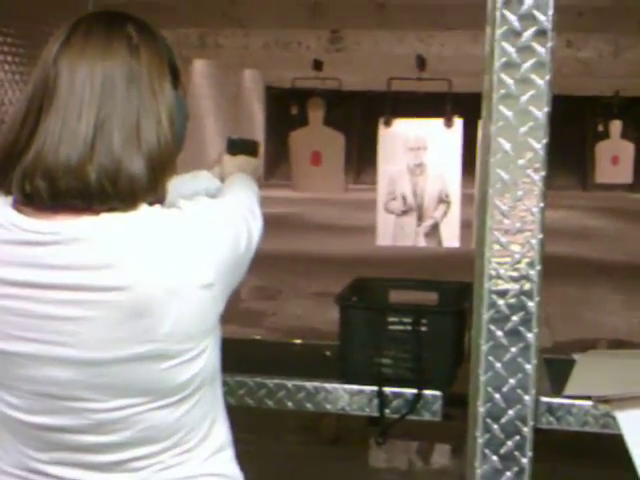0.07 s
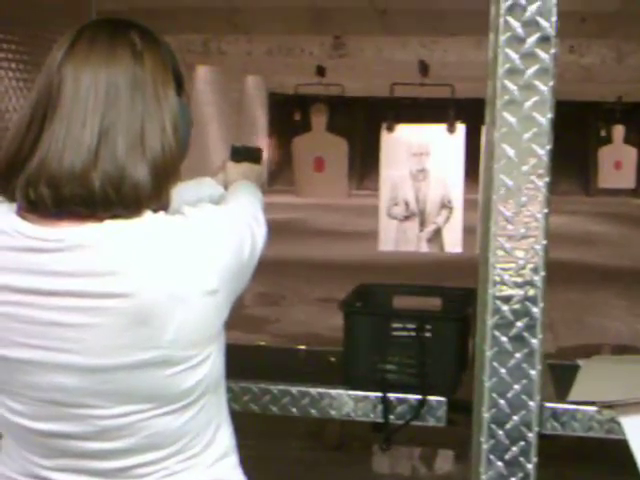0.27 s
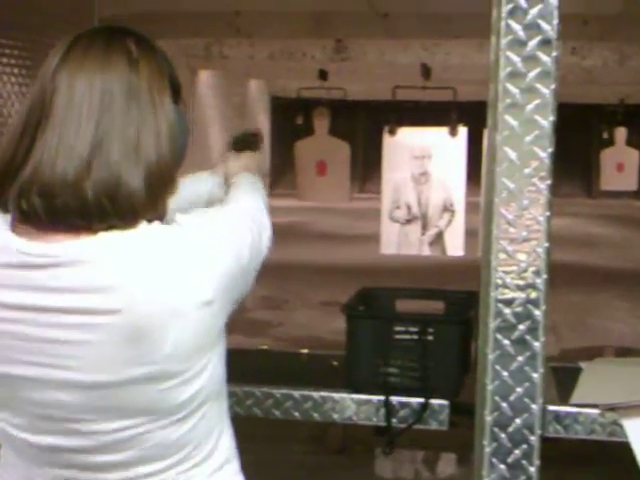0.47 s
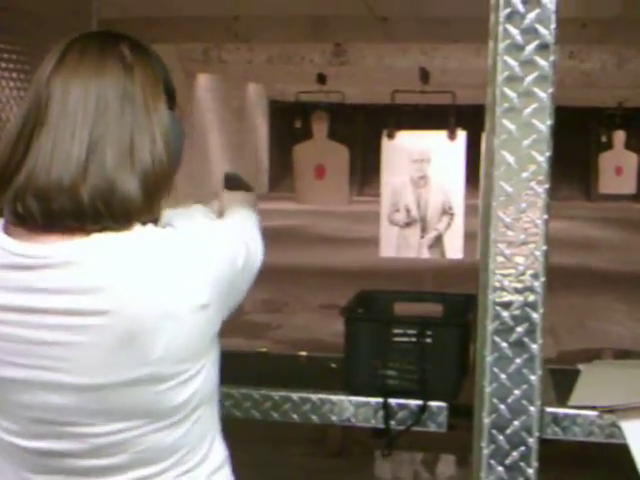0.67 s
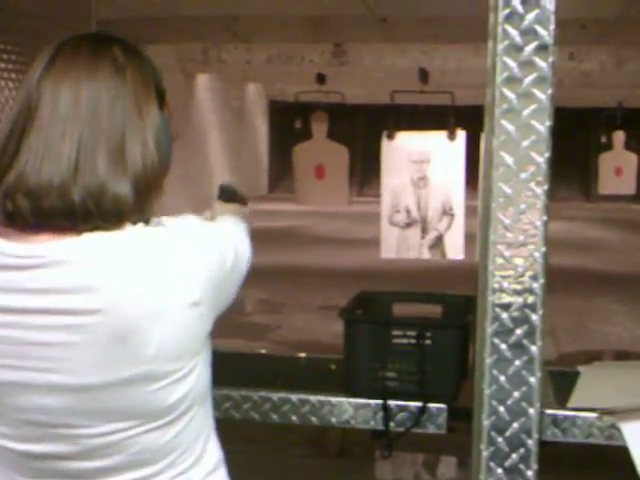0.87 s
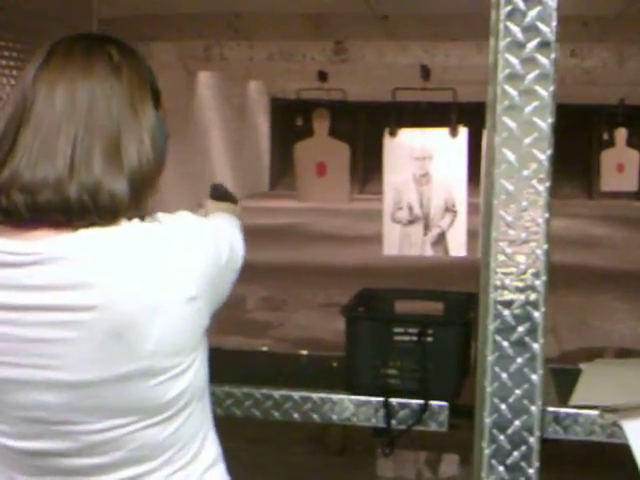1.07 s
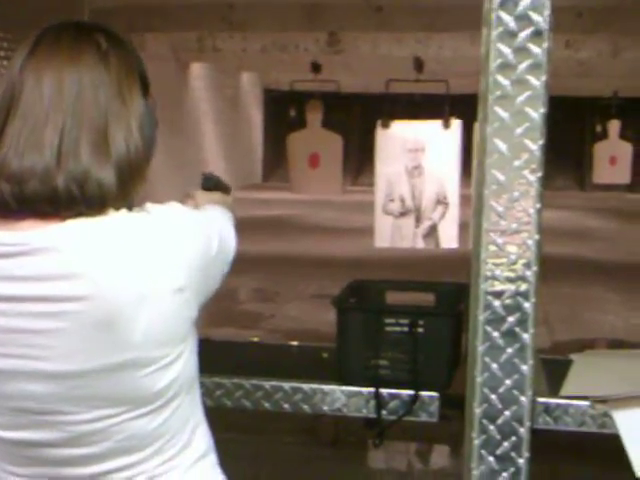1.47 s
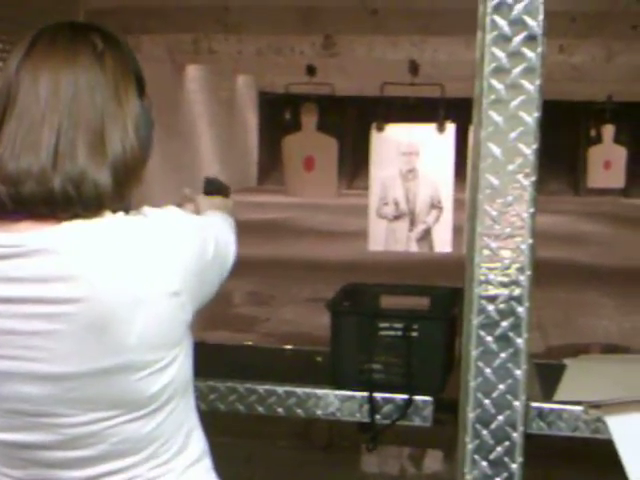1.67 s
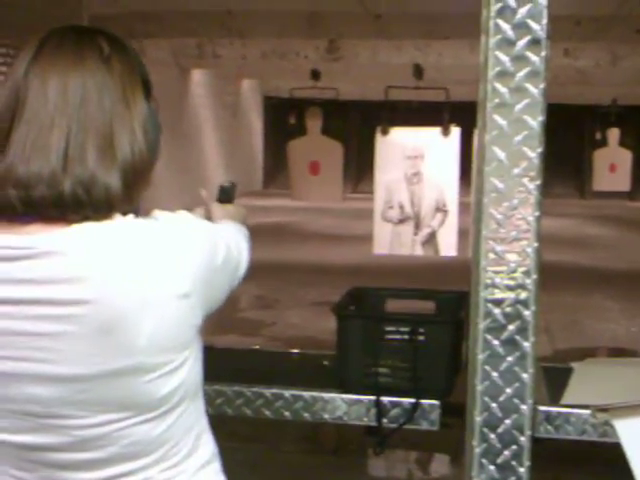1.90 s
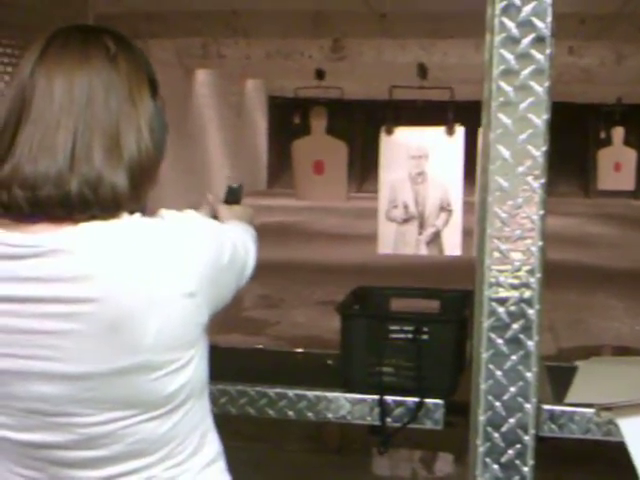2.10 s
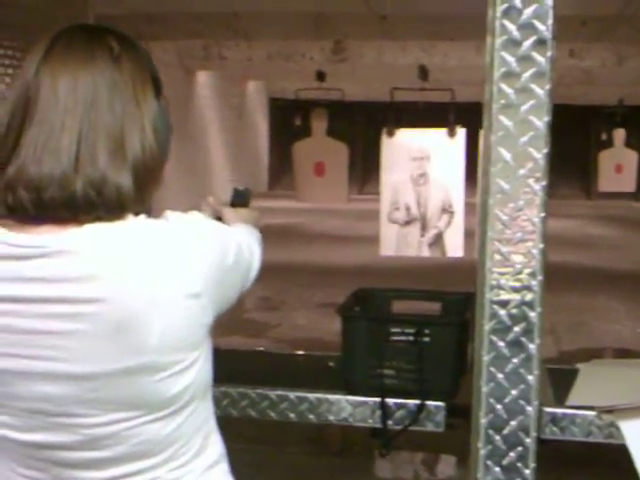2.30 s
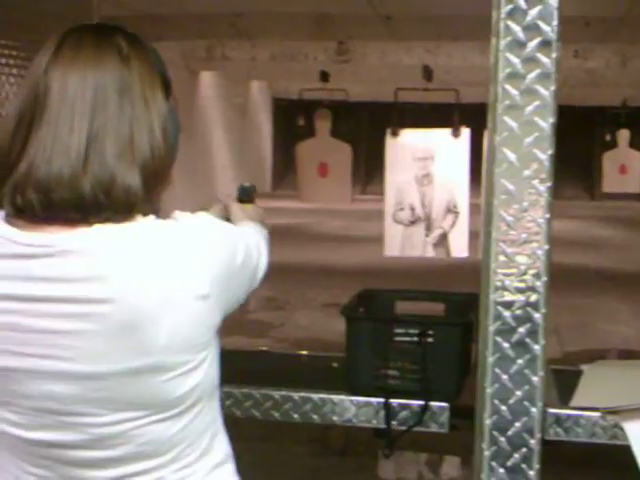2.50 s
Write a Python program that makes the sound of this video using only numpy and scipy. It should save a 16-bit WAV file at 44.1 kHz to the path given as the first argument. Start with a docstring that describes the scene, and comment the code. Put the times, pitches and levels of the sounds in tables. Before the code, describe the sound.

A handgun fires close by at about 0.25 seconds, a sharp crack that overloads the microphone, leaving everything afterward quieter. A weaker shot follows at 0.55 seconds, and the concrete shooting range rings for about a second. Two duller shots come close together at 1.9 and 2.0 seconds. Each bang has a quick echo off the far wall and fades over very faint ventilation, hiss and thin electronic whine.

```python
"""Indoor shooting range, a small camera microphone at the firing line: four handgun shots from the
nearest booth and the lanes beside it. Each blast cracks, rattles between the booth walls, returns from
the far wall and rings on in the concrete hall, over quiet ventilation. This close, the microphone
overloads lopsidedly and the camera ducks its gain; its electronics whine and hiss faintly."""
import sys
import numpy as np
from scipy import signal
from scipy.fft import rfft, irfft
from scipy.io import wavfile

SR = 44100
rng = np.random.default_rng(int(sys.argv[2]) if len(sys.argv) > 2 else 0)


def generate_wav(signal):
    """Clip the signal to [-1, 1] and save it as 16-bit WAV at the path in sys.argv[1]."""
    frames = np.transpose(np.atleast_2d(signal))
    scaled = np.clip(frames, -1, 1) * 32767
    pcm = np.round(scaled).astype(np.int16)
    wavfile.write(sys.argv[1], SR, pcm)


N = 116865
TIME, FREQS = np.arange(N) / SR, np.fft.rfftfreq(2 * N, 1 / SR)

# Tone of a blast off the nearby walls. Each row: frequency in Hz, relative level in dB.
BOOTH_SPECTRUM = [(30, -25.5), (120, -9), (350, -6), (650, -2), (1100, 2.5), (1500, -2.5), (2400, -12),
                  (4500, -8), (9500, -17), (13000, -49.5)]


def gunshots():
    """At the firing line: each blast cracks, rattles and booms in the booth, and sets the hall ringing."""
    # Each row: start in seconds, crack gain in dB, booth gain in dB, booth rise and t60 in seconds,
    # booth body and treble in dB, boom gain in dB, hall gain in dB.
    shots = [(0.2481, 5.5, 3, .005, 0.17, 6.5, 0, -23.5, -15),
             (0.5547, -19, -9, 0.001, 0.16, 9.5, 8.5, -31.5, -21),
             (1.8672, -54, 0.5, .007, 0.16, 13.5, 1, -18, -16.5),
             (2.0313, -14.5, -0.5, 0.00069, 0.14, -2.5, -9.5, -21, -15)]
    tail_treble_share = 0.21  # how much of a shot's brightness reaches the hall
    out = np.zeros(N)
    for start, crack_db, booth_db, rise_s, t60_s, body_db, treble_db, boom_db, hall_db in shots:
        shot = amp(booth_db) * reflections(BOOTH_SPECTRUM, rise_s, t60_s, shelves(body_db, treble_db))
        shot += amp(crack_db) * muzzle_crack()
        shot += amp(boom_db) * booth_boom()
        shot += amp(hall_db) * hall_tail(tail_treble_share * treble_db)
        add(out, start, shot)
    return out


def muzzle_crack(hold_s=0.0055, t60_s=0.018):
    """The bright first milliseconds of the blast, straight from muzzle to microphone."""
    # Tone of the crack. Each row: frequency in Hz, relative level in dB.
    spectrum = [(30, -21), (300, -10.5), (1000, -1), (2200, -3.5), (5000, 5), (9000, -3.5), (12000, -18.5),
                (16000, -27)]
    envelope = decay(np.maximum(TIME - hold_s, 0), t60_s)
    return colour(rng.standard_normal(N) * envelope, read(spectrum))


def booth_boom(hz=314.2):
    """A low standing wave builds up between the booth walls."""
    return 2 * swell(rise_s=0.063, t60_s=0.49) * sine(hz)


def slaps_and_slide(rise_s=0.0035, t60_s=0.065):
    """Sharp slaps off the walls and baffles close to the microphone, and the clack of the pistol's slide."""
    # Each row: start in seconds, then gain, body and treble in dB.
    slaps = [(0.2759, -2, -0.5, 4.5), (0.591, -21, -15, 25), (2.093, -3, 8, -10)]
    out = np.zeros(N)
    for start, db, body_db, treble_db in slaps:
        add(out, start, amp(db) * reflections(BOOTH_SPECTRUM, rise_s, t60_s, shelves(body_db, treble_db)))
    return out


def far_wall_echoes():
    """Each shot comes back from downrange about 0.14 s later, duller and with a ring."""
    # Each row: start in seconds, gain in dB, rise and t60 in seconds, body and ring in dB.
    echoes = [(0.3928, -4, 0.0042, 0.12, 7, 9), (0.6945, -11, 0.0081, .15, -20.5, 7),
              (2.009, -5.5, 0.0026, 0.067, 10, 2), (2.1706, -2.5, 0.0022, 0.16, -1, 8.5)]
    # Tone off the far wall. Each row: frequency in Hz, relative level in dB.
    spectrum = [(30, 8.5), (120, -11.5), (350, -9), (700, -1.5), (1200, 0.5), (1850, -8.5), (2300, -15.5),
                (2800, -12), (4200, -17.5), (9500, -32), (13000, -52)]
    out = np.zeros(N)
    for start, db, rise_s, t60_s, body_db, ring_db in echoes:
        tone_db = shelves(body_db, 0) + ring_db * bump(hz=1880, width_hz=300)
        add(out, start, amp(db) * reflections(spectrum, rise_s, t60_s, tone_db))
    return out


def reflections(spectrum, rise_s, t60_s, tone_db, per_second=5800, spread_db=6):
    """A dying cluster of copies of the blast, thrown back by hard surfaces."""
    arrivals = rng.random(N) < per_second / SR
    polarity = rng.choice([-1., 1.], N)
    strength = amp(spread_db * rng.standard_normal(N))
    cluster = unit(arrivals * polarity * strength) * swell(rise_s, t60_s)
    return colour(cluster, read(spectrum) + firing_line_ring() + tone_db)


def hall_tail(treble_db, rise_s=0.01):
    """Diffuse reverberation of the concrete hall; the treble dies first."""
    # Tone of the hall. Each row: frequency in Hz, relative level in dB.
    spectrum = [(30, -17), (90, -13), (200, -8), (400, -5.5), (750, -2), (1300, -4.5), (1900, -12),
                (2700, -17.5), (4200, -18.5), (7000, -23), (10000, -32.5), (13000, -59.5)]
    # Reverberation times. Each row: frequency in Hz, t60 in seconds.
    reverb_times = [(60, 2.4), (160, 1.61), (420, 1.59), (1100, 1.98), (2000, 2.03), (4000, 1.4),
                    (7500, .95), (11000, 0.82)]
    hz, t, bands = signal.stft(rng.standard_normal(N), SR, nperseg=512)
    bands = bands * decay(t, read(reverb_times, hz)[:, None])
    tail = signal.istft(bands, SR, nperseg=512)[1][:N] * np.minimum(TIME / rise_s, 1)
    return colour(tail, read(spectrum) + firing_line_ring() + shelves(0, treble_db))


def firing_line_ring():
    """Resonances of the firing line: peaks and one notch, in dB over frequency."""
    # Each row: centre in Hz, width in Hz, boost in dB.
    resonances = [(230, 11, 5), (410, 25, 6), (932, 18, -10), (1220, 13, 3.5), (1334, 89, 2.5),
                  (1793, 48, 3.5), (1920, 25, 1), (2660, 160, 5.5), (4050, 500, 3)]
    return sum(db * bump(hz, width_hz) for hz, width_hz, db in resonances)


def ventilation(level_db=-63.5):
    """Room tone: the ventilation and lingering noise of the range, quiet and steady."""
    # Each row: frequency in Hz, relative level in dB.
    spectrum = [(20, 1), (60, 3), (130, 0), (350, -8.5), (800, -2.5), (1270, -4.5), (2200, -20),
                (4500, -23), (10000, -33.5)]
    return amp(level_db) * colour(rng.standard_normal(N), read(spectrum))


def mic_overload(pressure, top=.29, bottom=.76, knee=3.2):
    """The microphone flattens the top of the wave well before the bottom, and spits on steep fronts."""
    # Microphone response. Each row: frequency in Hz, relative level in dB.
    response = [(2000, 2.5), (5000, -4), (8000, 0.5), (10500, 1), (11800, -6.5), (12900, -40), (16000, -44)]
    spit_step, spit_height, low_cut_hz = 2.7, 0.29, 20
    limit = np.where(pressure > 0, top, bottom)
    flattened = pressure / (1 + abs(pressure / limit) ** knee) ** (1 / knee)
    tone_db = read(response)
    toned = irfft(rfft(flattened, 2 * N) * amp(tone_db - tone_db[0]))[:N]
    jump = np.diff(pressure, prepend=0)
    spit = spit_height * np.tanh(np.maximum(jump - spit_step, 0))
    return signal.lfilter(*signal.butter(1, low_cut_hz, "highpass", fs=SR), toned + spit)


def gain_duck(x, trip_level=.58, duck_db=9.5, recover_db_per_s=4.1):
    """The first peak over the trip level pulls the camera's gain down; it holds, then creeps back."""
    lag_s, fall_s, hold_s = .012, .002, .45
    tripped = np.maximum.accumulate(abs(x) > trip_level)
    since_s = np.cumsum(tripped) / SR - lag_s
    recovered_db = recover_db_per_s * np.maximum(since_s - hold_s, 0)
    depth_db = np.maximum(duck_db - recovered_db, 0)
    return x * amp(-depth_db * np.clip(since_s / fall_s, 0, 1))


def camera_whine():
    """Thin steady tones from the camera's electronics."""
    # Each row: frequency in Hz, rms level in dB.
    tones = [(5798, -82), (6702, -75), (9598, -90)]
    return sum(amp(db) * np.sqrt(2) * sine(hz) for hz, db in tones)


def camera_hiss(level_db=-65):
    """Steady self-noise of the camera."""
    # Each row: frequency in Hz, relative level in dB.
    spectrum = [(20, 33.5), (60, 27), (150, 13), (400, 7), (2000, -2), (5000, 0.5), (10000, 1),
                (11500, -15.5), (13000, -31.5)]
    return amp(level_db) * colour(rng.standard_normal(N), read(spectrum))


def amp(db):
    """Decibels to gain."""
    return 10 ** (np.asarray(db) / 20)


def unit(x):
    """Scales to rms 1."""
    return x / np.sqrt(np.mean(x ** 2) + 1e-20)


def read(points, hz=FREQS):
    """Reads a table on a log-frequency axis."""
    f, value = np.transpose(points)
    return np.interp(np.log(hz + 1), np.log(f + 1), value)


def add(mix, start_s, sound):
    """Mixes a sound in at a time."""
    part = mix[round(start_s * SR):][:len(sound)]
    part += sound[:len(part)]


def colour(x, db):
    """Causal filter shaped by a dB curve, scaled so that white noise keeps its power."""
    log_gain = np.log(unit(amp(db)))
    mirrored = np.r_[log_gain, log_gain[-2:0:-1]]
    response = np.exp(np.conj(signal.hilbert(mirrored)))[:N + 1]
    return irfft(rfft(x, 2 * N) * response)[:N]


def sine(hz):
    """A steady tone at a random phase."""
    return np.sin(2 * np.pi * (hz * TIME + rng.random()))


def decay(t, t60_s):
    """Falls 60 dB in t60_s."""
    return np.exp(-np.log(1000) * t / t60_s)


def swell(rise_s, t60_s):
    """Quick rise, exponential fall."""
    return np.minimum(TIME / rise_s, 1) * decay(TIME, t60_s)


def shelves(body_db, treble_db, body_hz=600, treble_hz=3500):
    """Tone change in dB below body_hz and above treble_hz."""
    body = body_db / (1 + (FREQS / body_hz) ** 2)
    return body + treble_db * FREQS ** 2 / (FREQS ** 2 + treble_hz ** 2)


def bump(hz, width_hz):
    """Bell-shaped peak of height 1 over frequency."""
    return 1 / (1 + (2 * (FREQS - hz) / width_hz) ** 2)


def scene():
    """Sound pressure at the microphone, in mono."""
    return (gunshots() + slaps_and_slide() + far_wall_echoes() + ventilation())[None]


def record(dry):
    """Through the camera: overload, ducking, whine and hiss, then a band limit and a small DC offset."""
    edge_hz, dc_offset = 16500, -.0049
    out = gain_duck(mic_overload(dry[0])) + camera_whine() + camera_hiss()
    lowpass = signal.firwin(511, edge_hz, window=("kaiser", 9), fs=SR)
    return signal.oaconvolve(out, lowpass, "same")[None] + dc_offset


dry = scene()
out = record(dry)
generate_wav(out)
```